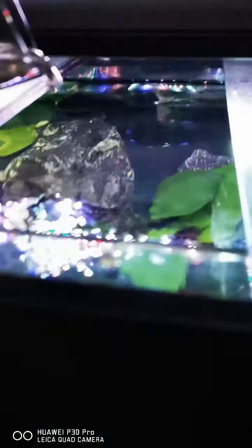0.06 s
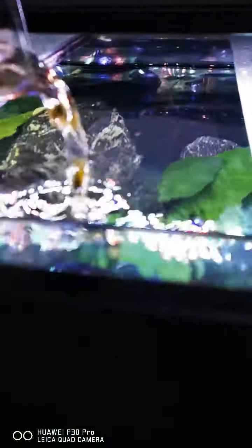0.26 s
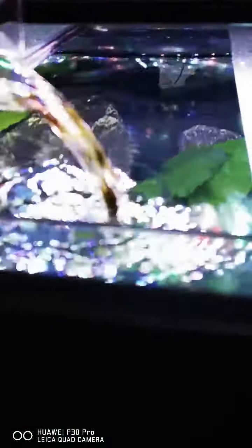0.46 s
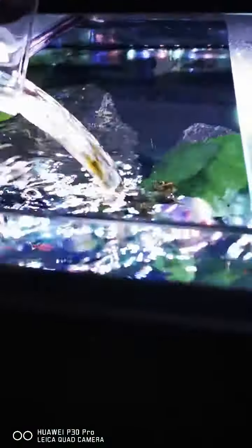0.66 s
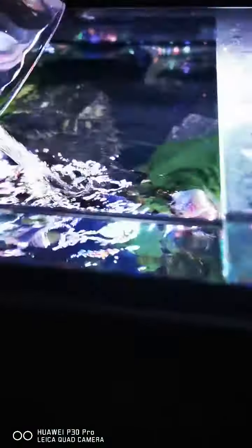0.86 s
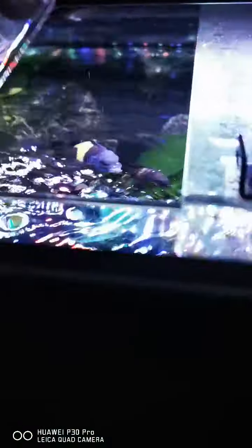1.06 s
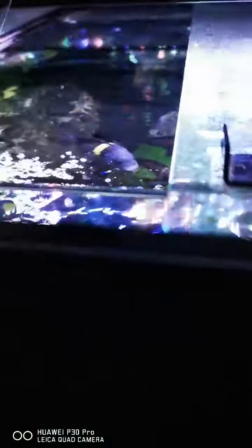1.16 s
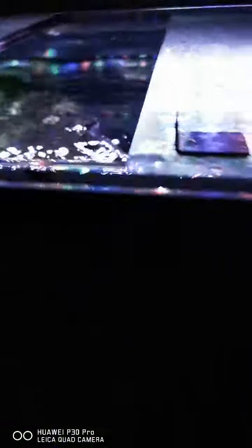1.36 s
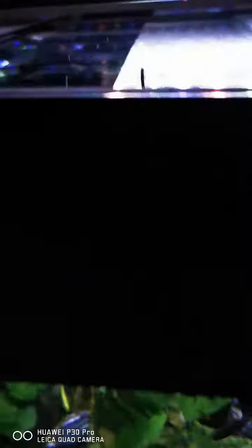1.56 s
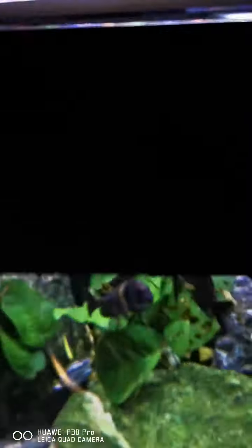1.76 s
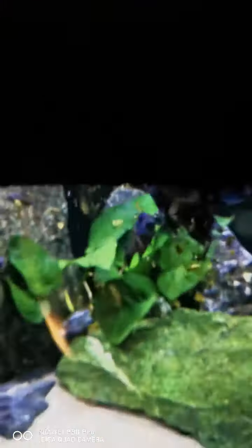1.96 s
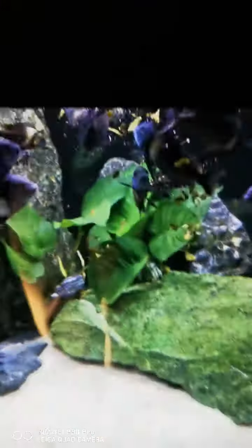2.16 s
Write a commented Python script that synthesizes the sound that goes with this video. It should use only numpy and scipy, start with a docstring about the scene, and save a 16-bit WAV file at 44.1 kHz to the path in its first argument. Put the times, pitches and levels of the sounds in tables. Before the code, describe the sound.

Water poured into a fish tank splashes and trickles briefly after a hollow knock.

```python
"""A hollow knock rings through a fish tank and its cabinet, then water is tipped in from a jug.
The thin stream smacks and spatters on the surface and traps air that rings, plops and gurgles;
the last drips of the pour fall near 1.1 s. A dull creak of quick slips follows, then a faint
rustle and a few handling clicks, over the low hum and hiss of a quiet room."""
import sys
import numpy as np
from scipy import signal
from scipy.fft import rfft, irfft, next_fast_len
from scipy.io import wavfile

SR = 44100
rng = np.random.default_rng(int(sys.argv[2]) if len(sys.argv) > 2 else 0)


def generate_wav(signal):
    """Clip the signal to [-1, 1] and save it as 16-bit WAV at the path in sys.argv[1]."""
    frames = np.transpose(np.atleast_2d(signal))
    scaled = np.clip(frames, -1, 1) * 32767
    pcm = np.round(scaled).astype(np.int16)
    wavfile.write(sys.argv[1], SR, pcm)


N = 97020
POUR_START_S, POUR_END_S = .34, 1.25

# Each row: frequency in Hz, left over right in dB.
WATER_PAN = [(500, 7), (2500, 10.5), (4500, 15.5), (8000, 16.5), (15000, 17.5)]
def water():
    """The pour, on the left and most so in the treble, with its reflections."""
    near = bubbles() + smacks() + plops() + gurgles()
    spray = fizz() + spatter()
    direct = left_first(panned_by_band(near + spray, WATER_PAN))
    return direct + panned(room(near, wet_db=-1) + room(spray, wet_db=-3.5), left_db=3)

def bubble(hz, t60_s, sharp=0.1, settle_s=0.00095, rise_per_s=1.2):
    """A bubble pinches off sharp, settles, then rises in pitch as it nears the surface."""
    t = clock(t60_s * 1.5)
    warped_s = t + sharp * settle_s * (1 - np.exp(-t / settle_s)) + rise_per_s * t ** 2 / 2
    return np.sin(2 * np.pi * hz * warped_s) * envelope(t, t60_s, attack_s=0.0003)

# Each row: start in seconds, pitch in Hz, level in dB, T60 in seconds.
BUBBLES = [(0.3628, 2380, -36.5, 0.006), (0.388, 2960, -65, 0.02), (0.4422, 4280, -50.5, 0.011),
           (0.479, 3000, -43.5, 0.006), (.5243, 2650, -27, 0.005), (.548, 2570, -43, 0.0052),
           (0.5589, 2460, -39, 0.014), (0.6285, 4450, -33.5, 0.008), (.638, 3930, -33.5, 0.005),
           (.6995, 2420, -48.5, 0.016), (0.782, 2410, -44, 0.0078), (0.832, 3805, -57, 0.029),
           (0.8718, 4070, -57.5, .012), (0.917, 4700, -52, 0.0061), (.9355, 4330, -52, 0.011),
           (.9865, 5500, -43.5, 0.0087), (0.9922, 6980, -38, 0.019), (1.041, 4230, -57.5, 0.019),
           (1.0796, 3600, -38.5, 0.01), (1.0913, 3280, -39.5, 0.01), (1.119, 2466, -35, 0.023),
           (1.471, 7600, -44.5, 0.0048)]
def bubbles():
    """Small trapped bubbles ring high."""
    out = np.zeros(N)
    for s, hz, db, t60_s in BUBBLES:
        add(out, s, amp(db) * bubble(hz, t60_s))
    return out

# Each row: start in seconds, centre in Hz, level in dB.
SMACKS = [(0.359, 5570, -45.5), (.372, 6260, -48.5), (0.4112, 6440, -50), (.4345, 10000, -45.5),
          (0.4568, 5470, -49.5), (.465, 10000, -51.5), (0.51, 10400, -41), (.5243, 5700, -44),
          (.5655, 5570, -44.5), (0.5897, 5760, -41.5), (.629, 8850, -50), (.642, 6460, -42),
          (.692, 7950, -54), (0.9642, 5960, -48), (0.9921, 6300, -32.5), (1.009, 6900, -44),
          (1.023, 7500, -44.5), (1.049, 4000, -55.5), (1.0792, 6260, -37), (1.0901, 6040, -36),
          (1.119, 5030, -43.5), (1.414, 8800, -52.5), (1.472, 9800, -50.5)]
def smacks():
    """Spray drops smack the surface."""
    out = np.zeros(N)
    for s, hz, db in SMACKS:
        add(out, s, amp(db) * crack(hz, octaves=0.45, t60_s=0.0029))
    return out

# Each row: start in seconds, pitch in Hz, level in dB.
PLOPS = [(.5655, 628, -36.5), (.573, 905, -48), (.621, 807, -53), (1.051, 1445, -54.5)]
def plops():
    """Big air pockets close under the stream with a slap and ring low."""
    out = np.zeros(N)
    for s, hz, db in PLOPS:
        add(out, s, amp(db) * ring(hz, t60_s=0.044, attack_s=0.0011, rise=0.025))
        add(out, s, amp(db - 1) * crack(1.55 * hz, octaves=1.0, t60_s=0.041))
    return out

# Each row: start in seconds, length in seconds, first pitch in Hz, last pitch in Hz, level in dB.
GURGLES = [(0.497, 0.031, 920, 2460, -53), (0.738, .068, 923, 2460, -52)]
def gurgles(count=30):
    """Runs of ever smaller bubbles swell and fade as they climb in pitch."""
    out = np.zeros(N)
    for s, length_s, first_hz, last_hz, db in GURGLES:
        for k, (late, sharp, loud) in enumerate(rng.standard_normal((count, 3))):
            progress = (k + .5) / count
            hz = first_hz * (last_hz / first_hz) ** progress * np.exp(0.244 * sharp)
            gain = amp(db + 5.3 * loud) * np.sqrt(np.sin(np.pi * progress))
            start_s = s + length_s * progress + 0.000963 * late
            add(out, start_s, gain * ring(hz, t60_s=0.015, attack_s=0.00064))
    return out

# Each row: time in seconds, stream level in dB.
FLOW_DB = [(.34, -88), (.365, -63.5), (.48, -70.5), (.57, -60.5), (.65, -63.5), (.73, -67), (.9, -80.5),
           (1.0, -73), (1.1, -69.5), (1.18, -80), (1.25, -110)]
# Each row: frequency in Hz, gain in dB.
FIZZ_EQ = [(400, -54), (700, 3.5), (1500, -13), (2600, 0), (5000, -5.5), (7000, -6), (11000, -30),
           (16000, -14)]
def fizz():
    """Countless tiny bubbles and a soft wash follow the strength of the stream."""
    out, span_s = np.zeros(N), POUR_END_S - POUR_START_S
    for s, hz, gain in scatter(per_s=900, low_hz=1200, ratio=12, spread_db=4, softening=0.016):
        add(out, s, gain * bubble(hz, t60_s=18 / hz))
    grains = unit(coloured(out, FIZZ_EQ)) * np.sqrt(span_s * SR / N)
    wash = amp(-7.5) * unit(coloured(rng.standard_normal(N), FIZZ_EQ))
    return amp(curve(FLOW_DB)) * (grains + wash)

# Each row: time in seconds, level in dB.
SPRAY_DB = [(.35, -97), (.362, -77), (.48, -80.5), (.58, -66), (.66, -74), (.74, -96), (.86, -74.5),
            (.95, -74), (1.02, -66), (1.1, -62), (1.16, -88)]
# Each row: frequency in Hz, gain in dB.
SPRAY_EQ = [(800, -20), (2500, 3), (6500, 8.5), (8500, -2), (10500, 11.5), (16000, -13)]
def spatter():
    """Tiny droplets tick on the surface at random, each at its own pitch."""
    out, span_s = np.zeros(N), POUR_END_S - POUR_START_S
    for s, hz, gain in scatter(per_s=200, low_hz=2000, ratio=7, spread_db=6.5, softening=0.038):
        add(out, s, gain * ring(hz, t60_s=5.4 / hz, attack_s=1 / hz))
    ticks = unit(coloured(out, SPRAY_EQ)) * np.sqrt(span_s * SR / N)
    return amp(curve(SPRAY_DB)) * ticks

# Each row: frequency in Hz, relative level in dB, T60 in seconds before the cap.
TANK_MODES = [(221.2, -8, .36), (253.8, 4, 0.29), (349.3, -2, 0.26), (378, -10, 0.15), (420.5, -7.5, 0.37),
              (441.3, -6.5, 0.26), (647, -11, 0.6), (775, -4, 0.14), (846, -33, 0.84), (902, -15.5, 0.44),
              (980, -29, 0.77), (1062, -5.5, 0.23), (1314, -11.5, 0.4), (2022, -31, 0.22)]
# Each row: frequency in Hz, relative density in dB.
CABINET_SPECTRUM = [(53, -45), (90, 3), (149, -15), (173, -7.5), (253, 3), (294, -17), (363, -5),
                    (577, -14.5), (844, -11), (1180, -12.5), (1290, -13.5), (1560, -10.5), (1960, -6.5),
                    (2530, -22), (14000, -70.5)]
# Each row: frequency in Hz, T60 in seconds.
CABINET_T60 = [(200, 0.48), (600, 0.43), (1000, 0.53), (2000, 0.35), (4000, 0.45), (10000, 0.51)]
def knock(start_s=.2203, t60_cap_s=.42):
    """One blunt blow, its echo off the glass, the modes of tank and jug, and the cabinet's boom."""
    out = np.zeros((2, N))
    blow = -amp(-19) * ring(990, t60_s=0.0094, attack_s=0.00054)
    blow = signal.sosfilt(signal.butter(2, 3000, fs=SR, output="sos"), blow)
    add(out, start_s, left_first(panned(2.3 * blow, left_db=5)))
    add(out, start_s + 0.0047, panned(amp(-11) * blow, left_db=-1))  # echo
    edge = amp(-45) * crack(3420, octaves=0.28, t60_s=0.086)
    add(out, start_s + 0.00067, panned(edge, left_db=20))
    for hz, db, t60_s in TANK_MODES:
        mode = amp(db - 32.5) * ring(hz, min(t60_s, t60_cap_s), attack_s=0.0033)
        add(out, start_s + rng.uniform(0, .004), panned(mode, left_db=rng.normal(1, 1.7)))
    boom = decayed(stereo_noise(CABINET_SPECTRUM, TAIL_COHERENCE, size=SR), CABINET_T60)
    add(out, start_s + .002, panned(amp(-30) * boom, left_db=-0.5))
    return signal.sosfilt(signal.butter(3, [213, 9000], "band", fs=SR, output="sos"), out)

# Each row: centre time in seconds, peak in dB.
SLIPS = [(1.444, -47), (1.454, -44), (1.4646, -43.5), (1.475, -47.5), (1.486, -52), (1.494, -44.5)]
# Each row: frequency in Hz, reverb T60 in seconds.
CREAK_T60 = [(200, 1.0), (350, 0.82), (550, 0.13)]
def creak(hz=360, width_s=0.0016, trail_count=20, gap_s=.0105, jitter_s=0.00227, fade_db_per_s=61):
    """Dull slips, about a hundred a second, then weaker uneven ones that die away in the room."""
    out, t = np.zeros(N), clock(.012) - .006
    slip = np.cos(2 * np.pi * hz * t) * np.exp(-(t / width_s) ** 2 / 2)
    for s, db in SLIPS:
        add(out, s + t[0], amp(db) * slip)
    for k, (late, loud) in enumerate(rng.standard_normal((trail_count, 2)), 1):
        after_s = k * gap_s + jitter_s * late
        add(out, SLIPS[-1][0] + after_s + t[0], amp(-53 - fade_db_per_s * after_s + loud) * slip)
    return out + room(out, wet_db=-7, t60s=CREAK_T60)

# Each row: start in seconds, centre in Hz, level in dB.
CLICKS = [(1.83, 2860, -47), (1.842, 4570, -58), (1.8537, 4200, -50.5), (1.8562, 1350, -47),
          (1.8833, 5080, -41.5), (1.8845, 1450, -45.5), (1.893, 2470, -54)]
# Each row: start in seconds, pitch in Hz, level in dB.
BUMPS = [(1.039, 215, -46), (2.009, 279, -54.5)]
def handling():
    """Small clicks with a hollow body on the right, and soft bumps of the hand."""
    clicks, bumps = np.zeros((2, N))
    for s, hz, db in CLICKS:
        add(clicks, s, amp(db) * crack(hz, octaves=0.44, t60_s=0.0044))
        add(clicks, s, amp(db - 8.5) * ring(900, t60_s=0.0092))
    for s, hz, db in BUMPS:
        add(bumps, s, amp(db) * ring(hz, t60_s=0.031, attack_s=0.001))
    return panned(clicks, left_db=-13.5) + room(clicks, wet_db=-4.5) + bumps

# Each row: time in seconds, level in dB.
RUSTLE_DB = [(1.3, -76), (1.55, -74), (1.7, -64.5), (1.8, -67.5), (1.86, -62), (1.95, -70.5), (2.03, -69),
             (2.07, -67.5), (2.2, -70)]
SIZZLE_DB = [(1.75, -98), (1.85, -68.5), (1.93, -81), (2.02, -79), (2.06, -72), (2.2, -79)]
# Each row: frequency in Hz, relative density in dB.
RUSTLE_SPECTRUM = [(300, -0.5), (800, -2), (1100, -5), (1400, 1), (2200, -10), (3200, -7.5), (7000, -18.5),
                   (11000, -23), (16000, -31)]
def rustle():
    """A faint handling rustle, joined late by a treble sizzle."""
    sizzle_spectrum = [(2500, -13), (5500, -2), (8000, -10), (11000, 0), (16000, -16)]
    sizzle = stereo_noise(sizzle_spectrum, coherence=[(3000, 0.0068)])
    body = stereo_noise(RUSTLE_SPECTRUM, coherence=[(300, 0.27), (3000, 0.052)])
    return amp(curve(RUSTLE_DB)) * body + amp(curve(SIZZLE_DB)) * sizzle

# Each row: frequency in Hz, T60 in seconds.
ROOM_T60 = [(200, 0.87), (1000, 0.52), (2500, 0.33), (6000, 0.31), (14000, 0.41)]
# Each row: frequency in Hz, left-right correlation.
TAIL_COHERENCE = [(150, 0.68), (300, 0.89), (640, -0.18), (1400, -0.15), (6000, -0.051)]
def room(x, wet_db, t60s=ROOM_T60, early_t60_s=0.036):
    """Close glass walls answer first, then the room."""
    t = clock(.5)
    white = stereo_noise([(100, 0), (16000, 0)], TAIL_COHERENCE, size=len(t))
    tail = decayed(white, t60s)[:, :len(t)]
    early = rng.standard_normal(tail.shape) ** 3 * amp(-60 * t / early_t60_s) * (t > .002)
    response = sum(part / np.linalg.norm(part, axis=1, keepdims=True) for part in (tail, early))
    return amp(wet_db) * signal.fftconvolve(x[None], response, axes=1)[:, :N]

# Each row: frequency in Hz, rms level in dB.
HUM_TONES = [(99, -77), (176, -83), (242, -73.5), (346, -76.5)]
def hum():
    """Low tones, each wandering slightly in phase."""
    out, t = np.zeros(N), np.arange(N) / SR
    for hz, db in HUM_TONES:
        drift_rad = 4 * np.cumsum(rng.standard_normal(N)) / np.sqrt(SR)
        out += amp(db) * np.sqrt(2) * np.sin(2 * np.pi * hz * t + drift_rad)
    return out

# Each row: frequency in Hz, relative density in dB.
FLOOR_SPECTRUM = [(12, -27), (20, 5.5), (70, -5), (102, -0.5), (129, -8.5), (167, 0), (280, -2.5),
                  (408, -6.5), (536, -8), (648, -15), (912, -13.5), (1200, -24.5), (1560, -47),
                  (2640, -120)]
HISS_SPECTRUM = [(710, -48), (1200, -20), (1340, -2.5), (1570, -27), (1930, -8), (2080, -5), (2420, -0.5),
                 (2840, -8.5), (3170, -1.5), (3760, -13.5), (4100, -10), (5550, -8.5), (6390, -17),
                 (13400, -18.5), (15800, -15)]
# Each row: time in seconds, level in dB.
FLOOR_DB = [(0, -64), (.3, -66.5), (1.2, -62), (2.2, -64.5)]
HISS_DB = [(0, -72.5), (.3, -73), (1.2, -68.5), (1.6, -71.5), (2.2, -70.5)]
# Each row: frequency in Hz, left-right correlation.
FLOOR_COHERENCE = [(60, 0.52), (180, 0.92), (550, 0.64), (1650, 0.045), (4970, 0.068), (15000, 0.022)]
# Each row: frequency in Hz, left over right in dB.
FLOOR_PAN = [(30, -3.5), (120, 6), (300, -0.5), (1500, -1.5)]
def background():
    """Hum, low room noise and a thin hiss."""
    low = hum() + amp(curve(FLOOR_DB)) * stereo_noise(FLOOR_SPECTRUM, FLOOR_COHERENCE)
    hiss = amp(curve(HISS_DB)) * stereo_noise(HISS_SPECTRUM, FLOOR_COHERENCE)
    return panned_by_band(low, FLOOR_PAN) + panned(hiss, left_db=-2)

def scatter(per_s, low_hz, ratio, spread_db, softening):
    """Random (start in seconds, Hz, gain) over the pour; softening limits the loudest."""
    span_s = POUR_END_S - POUR_START_S
    for when, pitch, size in rng.random((int(per_s * span_s), 3)):
        gain = amp(-spread_db * np.log(size + softening))
        yield POUR_START_S + when * span_s, low_hz * ratio ** pitch, gain

def ring(hz, t60_s, attack_s=0.00039, rise=0):
    """Damped sine; pitch climbs by the fraction rise per T60."""
    t = clock(t60_s * 1.5)
    return np.sin(2 * np.pi * hz * t * (1 + rise * t / t60_s / 2)) * envelope(t, t60_s, attack_s)

def crack(hz, octaves, t60_s):
    """Noise burst around a centre frequency, peak 1."""
    t = np.arange(2048) / SR
    band = lambda f: 1 / (1 + np.abs(np.log2((f + 1) / hz) / octaves) ** 2.33)
    burst = filtered(rng.standard_normal(len(t)), band) * envelope(t, t60_s, attack_s=0.01 * t60_s)
    return burst / np.abs(burst).max()

def stereo_noise(spectrum, coherence, size=N):
    """Noise of rms 1 with a given spectrum and left-right correlation."""
    def mid_side_gains(hz):
        angle = np.arccos(np.clip(along(coherence, hz), -1, 1)) / 2
        return amp(along(spectrum, hz)) * [np.cos(angle), np.sin(angle)]
    mid, side = filtered(rng.standard_normal((2, size)), mid_side_gains)
    return unit(np.array([mid + side, mid - side]))

def decayed(noise, t60s):
    """Each frequency fades at its own rate."""
    hz, t, bins = signal.stft(noise, SR, nperseg=256)
    return signal.istft(bins * amp(-60 * t / along(t60s, hz)[:, None]), SR, nperseg=256)[1]

def envelope(t, t60_s, attack_s):
    """Exponential attack and decay."""
    return amp(-60 * t / t60_s) * (1 - np.exp(-t / attack_s))

def left_first(x, lead_s=0.00021):
    """Sound from the left reaches the left microphone first."""
    return filtered(x, lambda hz: np.exp(1j * np.pi * hz * lead_s * np.array([[1], [-1]])))

def panned(x, left_db):
    """Stereo, left over right by left_db."""
    return x * np.array([amp(left_db / 2), amp(-left_db / 2)]).reshape(2, -1)

def panned_by_band(x, rows):
    """Pan by (Hz, dB) rows."""
    return filtered(x, lambda hz: panned(1, along(rows, hz)))

def coloured(x, rows):
    """Equalise by (Hz, dB) rows."""
    return filtered(x, lambda hz: amp(along(rows, hz)))

def filtered(x, response):
    """Apply a frequency response."""
    size = next_fast_len(x.shape[-1] + 4096)
    return irfft(rfft(x, size) * response(np.fft.rfftfreq(size, 1 / SR)), size)[..., :x.shape[-1]]

def along(rows, hz):
    """Interpolate (Hz, value) rows on a log axis."""
    row_hz, values = np.transpose(rows)
    return np.interp(np.log(hz + 1), np.log(row_hz + 1), values)

def curve(rows):
    """Interpolate (seconds, value) rows per sample."""
    return np.interp(np.arange(N) / SR, *np.transpose(rows))

def add(track, s, sound):
    """Mix a sound in at s seconds."""
    part = track[..., max(0, round(s * SR)):][..., :sound.shape[-1]]
    part += sound[..., :part.shape[-1]]

def clock(length_s):
    """Sample times in seconds."""
    return np.arange(int(length_s * SR)) / SR

def amp(db):
    """Decibels to gain."""
    return 10 ** (np.asarray(db) / 20)

def unit(x):
    """Scale to rms 1."""
    return x / np.sqrt(np.mean(x ** 2) + 1e-20)

def scene():
    """Everything as heard from the front of the tank."""
    return knock() + water() + creak() + handling() + rustle() + background()

def record(dry):
    """Brick-wall low-pass at 16 kHz."""
    return filtered(dry, lambda hz: hz < 16000)

dry = scene()
out = record(dry)
generate_wav(out)
```